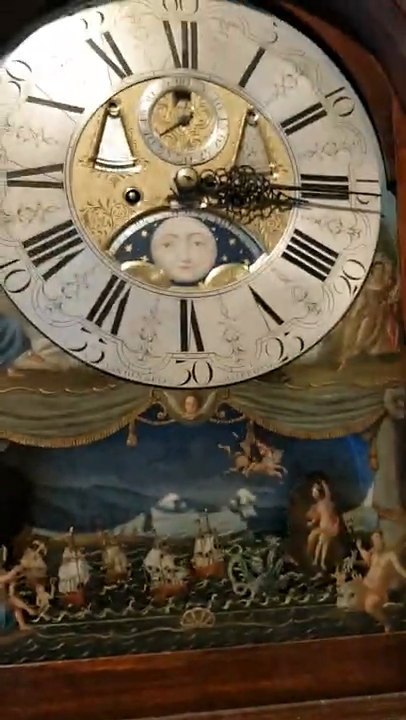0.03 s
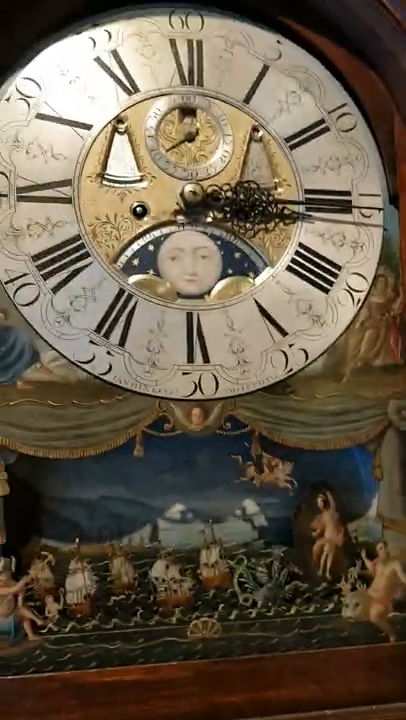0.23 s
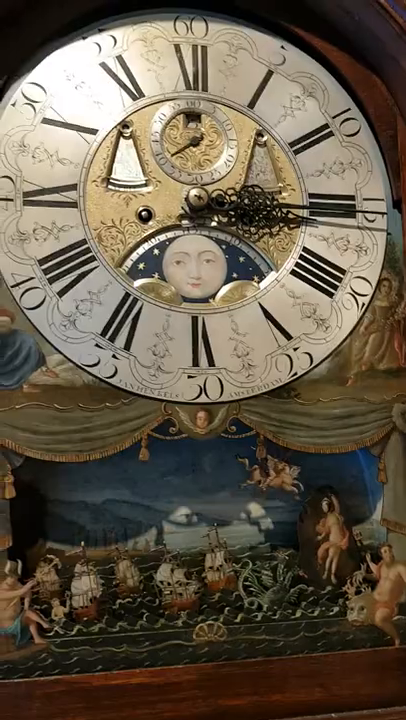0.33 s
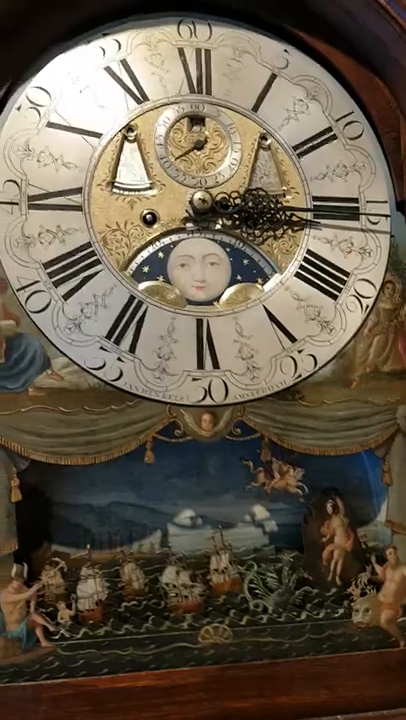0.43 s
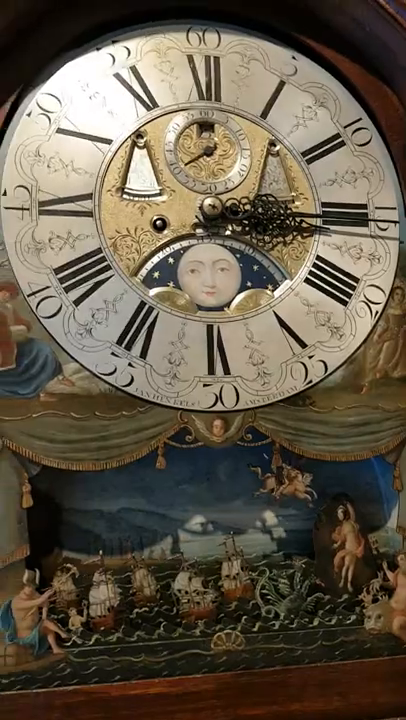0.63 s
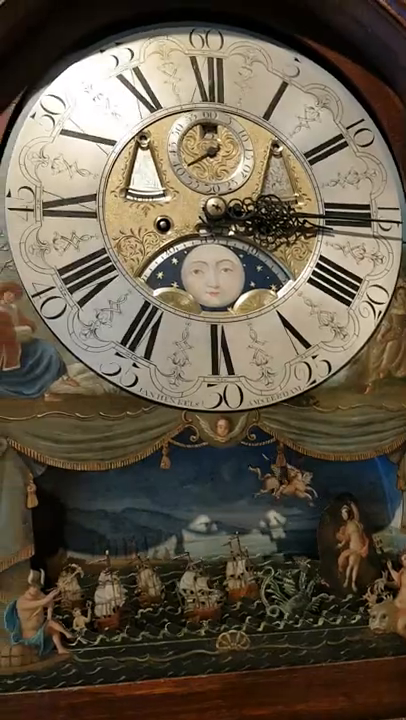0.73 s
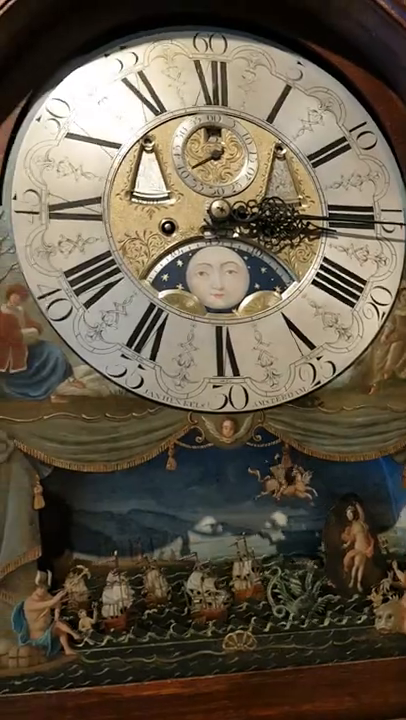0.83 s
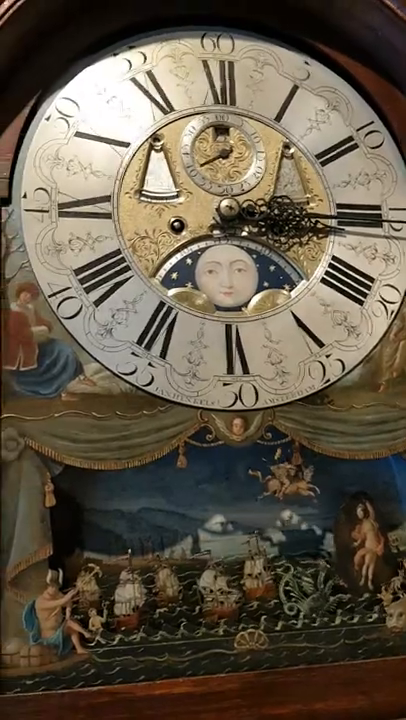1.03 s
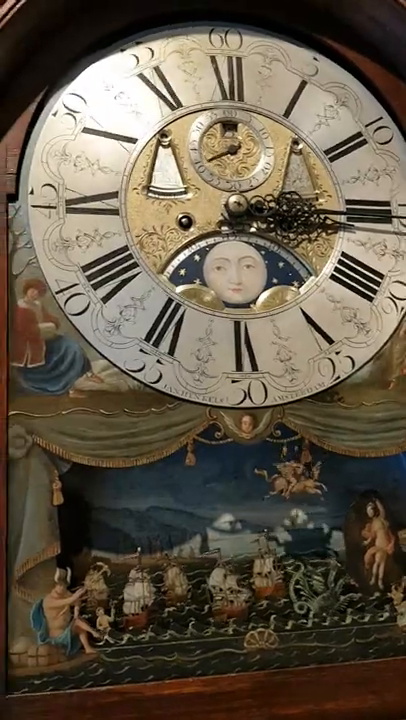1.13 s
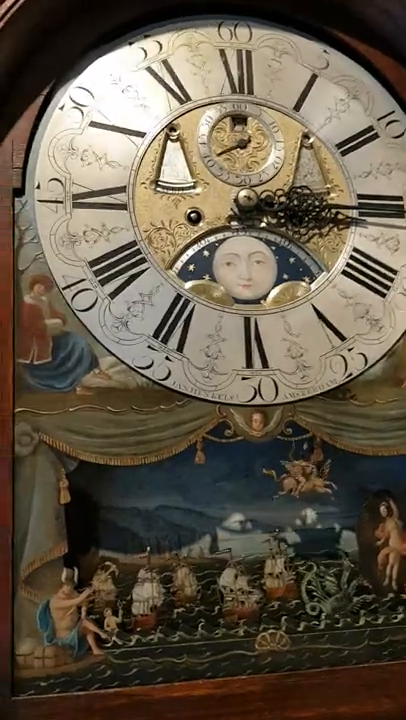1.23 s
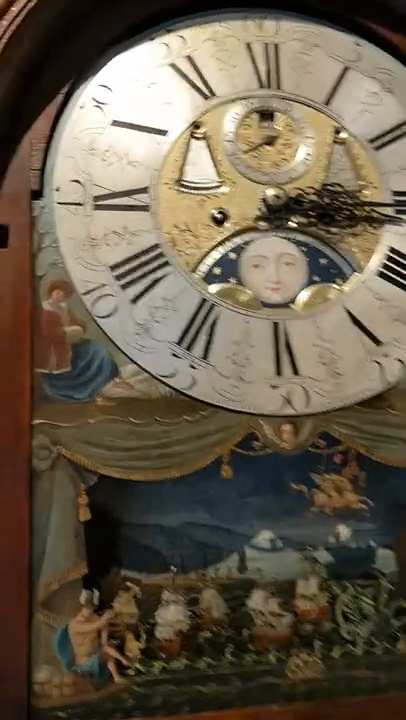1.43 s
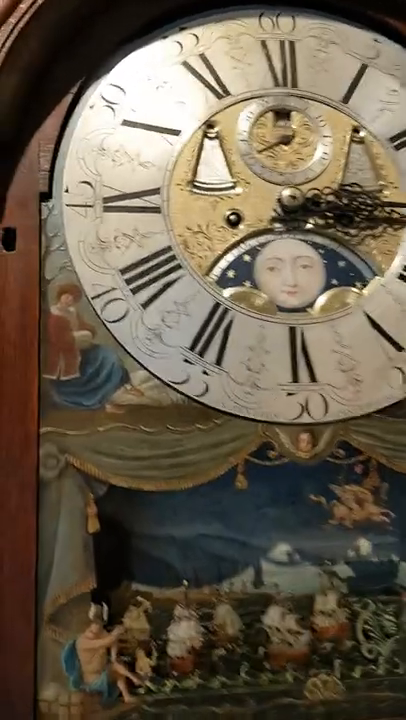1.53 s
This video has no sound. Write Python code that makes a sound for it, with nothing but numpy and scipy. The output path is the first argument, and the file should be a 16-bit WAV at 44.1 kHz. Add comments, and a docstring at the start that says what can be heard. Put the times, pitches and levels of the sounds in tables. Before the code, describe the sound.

A single clock bell stroke, close in a quiet room. Faint hiss until about 0.22 seconds, when the hammer trips with a click and hits at 0.23: a hard, brilliant clang. Piercing overtones fade first, leaving a wavering, beating ring to the end at about 1.5. Small clicks follow at 0.35 and 0.63, soft whirring beneath, then very faint rattles and a dull wooden double knock near 1.15.

```python
"""One bright bell stroke rings out, its split partials beating as they fade, most of the high ones first.
Place: a quiet room, a longcase clock close by, heard through a stereo pair of microphones.
The bell is a sum of decaying sinusoids; the hammer trips with a click and lands as a burst of coloured noise.
Enveloped noise also makes the lever clicks, thin rattles and dull knocks of the wooden case.
Behind them steady coloured noises make the soft whirr of the works, a hiss and a low hum."""
import sys
import numpy as np
from scipy import signal
from scipy.fft import rfft, irfft
from scipy.io import wavfile

SR = 44100
rng = np.random.default_rng(int(sys.argv[2]) if len(sys.argv) > 2 else 0)


def digitize_waveform(pressure):
    """Quantize a signal to 16-bit integers and store it at the path in sys.argv[1].

    Rows of a 2-D input are taken as channels; values are limited to [-1, 1].
    """
    field = np.atleast_2d(pressure).T
    bounded = np.clip(field, -1, 1)
    quanta = np.round(bounded * 32767).astype(np.int16)
    wavfile.write(sys.argv[1], SR, quanta)


N = 70560
TIME = np.arange(N) / SR  # s

# Colours list [f/Hz, relative density/dB per Hz]: noise() sets the rms to 1, the level comes after.
# Time constants of a rise are called rise or swell; t60 is the time to fall by 60 dB.

# Long partials of the bell, before sway and twin: [f/Hz, level/dB, left minus right/dB, width/half cycles
# between channels, t60/s, swell/s, beat/Hz (negative: twin below), twin level/dB, time of a dip/s,
# beat lag between channels/cycles]
LONG_PARTIALS = [ (593.3, -41, -1.8, .2, 40, .003, 2.6, -5.5, .41, 0),
                 (1608.4, -36, 3, .44, 60, .003, 3.82, -6.5, .405, .06),
                 (2964.0, -29, 6.5, .4, 7.5, .003, 22.7, -27, .29, .2),
                 (4623.2, -29.5, -1, .72, 2.8, .012, 36, -22, .25, .3),
                 (6508.5, -19.5, 1, .36, .85, .01, 26.5, -8, .246, .4),
                 (11150.5, -25, 7, .35, .52, .006, -19.5, -7, .279, .05)]
# Slow sway of three long partials, keyed by f/Hz: [t/s, level/dB]
SWAY = {1608.4: [(.23, -2), (.35, -2), (.5, 0), (.95, -1), (1.08, -1.5), (1.19, 5), (1.33, 1.5), (1.5, 3),
        (1.6, 2)], 2964.0: [(.23, 0), (.4, 1), (.7, 1), (.89, -3), (.95, 0), (1.07, -8), (1.17, 1),
        (1.28, 2), (1.45, 0), (1.55, 2)], 4623.2: [(.23, 0), (.32, 3), (.5, 2), (.6, -3), (.7, 1), (.8, 0),
        (.98, 3), (1.15, 0), (1.35, 5), (1.46, 0), (1.6, 7)]}
# Short partials of the bell, before CLANG_DB: [f/Hz, level/dB, left minus right/dB,
# width/half cycles between channels, t60/s]
SHORT_PARTIALS = [ (5437, -42, 0, .4, .17), (8365, -34, 0, .4, .44), (8679, -36, 2, .5, .38),
                  (8720.3, -19, 4, .25, .3), (9382.7, -32, -5, .4, .48), (10280.3, -35, -1, .3, .38),
                  (10351, -39, 0, .4, .4), (10830, -43, 2, .4, .4), (11131, -40, 1, .25, 1.3),
                  (11500, -42, 2, .4, .55), (12658, -34, 7, .4, .3), (13113.7, -34, 4, .4, .38),
                  (13817, -36, 3, .55, .48), (13849.3, -19.5, 6, .7, .36), (14744.8, -27, 5, .4, .32),
                  (14840, -36, 2, .4, .3), (15082.4, -27, -1, .4, .35), (15178, -44, 2, .25, 1.4),
                  (15240, -48, 2, .3, 1.0)]
# Colour of the hammer's crash on bell and frame: [f/Hz, density/dB per Hz]
CRASH_COLOUR = [(60, -29), (250, -10), (900, -15.5), (2400, 0.5), (3500, -10), (5800, -8), (8700, 6),
                (10000, 2.5), (11300, 1), (12100, 7.5), (13300, -5), (15500, -4)]
# Lever clicks: [t/s, level/dB, t60/s, room tail relative to the click/dB]
CLICKS = [(0.2188, -16.5, 0.012, -20), (0.352, -27, 0.024, -13), (0.6271, -30, 0.063, -11.5),
          (0.97, -54.5, 0.024, -11), (1.065, -59, 0.055, -1), (1.085, -57, .06, -12), (1.16, -62, 0.18, 2),
          (1.473, -55.5, 0.045, -4.5), (1.49, -65, 0.032, -11)]
# Colour of a click's crack: [f/Hz, density/dB per Hz]
CLICK_COLOUR = [(100, -11), (500, -10), (2300, -25), (4000, -5), (6000, -7), (8000, 2.5), (13000, -8),
                (16000, 4)]
# Colour of a click's room tail: [f/Hz, density/dB per Hz]
CLICK_TAIL_COLOUR = [(80, -34), (340, 7.5), (900, 3.5), (2100, 8.5), (3600, -6), (6000, 0), (8000, -1.5),
                     (13000, 1), (16000, -9.5)]
# Faint rattles of the works: [t/s, level/dB, t60/s]
RATTLES = [(.972, -50.5, 0.13), (1.065, -51, 0.25), (1.095, -66, 0.06), (1.325, -68.5, .08),
           (1.489, -48.5, 0.089)]
# Colour of the rattles: [f/Hz, density/dB per Hz]
RATTLE_COLOUR = [(600, -22.5), (1700, -4), (2050, -2), (2500, -0.5), (3500, -7.5), (11200, -33),
                 (11900, -0.5), (12800, -22), (16000, -34)]
# Dull knocks in the wooden case: [t/s, level/dB]
KNOCKS = [(.355, -53.5), (.63, -51), (1.136, -39.5), (1.16, -41)]
# Colour of the knocks: [f/Hz, density/dB per Hz]
KNOCK_COLOUR = [(40, -27), (130, -10.5), (330, -0.5), (560, -2.5), (800, -13), (1500, -19.5), (4000, -21.5),
                (12000, -44)]
# Level of the whirr of the works: [t/s, rms level/dB]
WHIRR_LEVEL = [(0, -82), (.2, -59), (.25, -51.5), (.42, -53.5), (.6, -54), (.85, -57.5), (1.08, -61.5),
               (1.3, -61.5), (1.6, -58.5)]
# Colour of the whirr: [f/Hz, density/dB per Hz]
WHIRR_COLOUR = [(60, -13), (150, -19), (195, 2), (260, -12.5), (360, -3.5), (750, -7.5), (1300, -9.5),
                (2400, -13.5), (3600, -24), (8000, -41), (16000, -53)]
# Level of the background hiss: [t/s, rms level/dB]
HISS_LEVEL = [(0, -54), (.2, -54.5), (.4, -57), (.9, -62.5), (1.03, -62), (1.2, -53), (1.4, -58),
              (1.6, -56.5)]
# Colour of the hiss: [f/Hz, density/dB per Hz]
HISS_COLOUR = [(25, -1), (50, 2), (200, 12), (600, 8.5), (1100, 12), (2000, 6.5), (3500, 3), (6000, -1),
               (12000, -2), (16000, 6.5)]
# Level of the low hum of the room: [t/s, rms level/dB]
ROOM_HUM_LEVEL = [(0, -80), (.4, -68), (1.05, -65), (1.4, -68.5), (1.55, -55), (1.6, -55)]
# Colour of the low hum: [f/Hz, density/dB per Hz]
ROOM_HUM_COLOUR = [(20, -29), (50, -10), (76, -22), (96, 5.5), (118, -20), (200, -26), (400, -44)]
# Noise at the two microphones: [f/Hz, likeness from -1 to 1, left minus right/dB]
STEREO = [(60, 1, -0.5), (303, 0.77, -1), (1000, 0.12, 0), (2505, 0.09, 0.5), (5600, 0.033, 0),
          (7500, 0.1, 3.5), (13000, 0.041, 1.5)]

STRIKE_S = .232
CLANG_DB, CLANG_SWELL_S = 1, .0031
WAVER_DB, WANDER_RAD, WAVER_PER_S = .8, .12, 4  # spreads and speed of each partial's slow drifts
FLUTTER, FLUTTER_PER_S, FLUTTER_T60_S = .24, 37, 1.6  # reflections from case and room
CRASH_DB, CRASH_T60_S = -28.5, .065
CRASH_TAIL_DB, CRASH_TAIL_T60_S = -30.5, .6
CRACK_RISE_S, BLOW_RISE_S, RATTLE_RISE_S = .0003, .0008, .0027
ROOM_T60_S = .41
KNOCK_T60_S, KNOCK_TAIL_DB, KNOCK_TAIL_T60_S = .07, -6, .67  # tail level relative to the knock
CUTOFF_HZ = 15700
HALVES = np.array([[.5], [-.5]])  # shares a left-right difference between the channels


def bell():
    """Long modes beat against weaker twins and some sway; short modes make the bright clang."""
    clang = sum(partial(*row, CLANG_SWELL_S) for row in SHORT_PARTIALS)
    out = from_db(CLANG_DB) * clang
    for hz, *mode, beat, twin_db, dip, lag in LONG_PARTIALS:
        twin_cycles = beat * (TIME - dip) - lag * HALVES
        beating = 1 - from_db(twin_db) * np.exp(2j * np.pi * twin_cycles)
        sway = level(SWAY[hz]) if hz in SWAY else 1
        out = out + partial(hz, *mode) * beating * sway
    return out.real


def partial(hz, db, pan_db, width, t60, swell):
    """One bell mode: a decaying complex sinusoid, drifting in level and phase in each channel."""
    cycles = hz * (TIME - STRIKE_S) + rng.random()
    phase = 2 * np.pi * cycles + np.pi * width * HALVES
    phase = phase + WANDER_RAD * drift(WAVER_PER_S)
    # reflections ruffle the young mode in level and phase
    reflections = drift(FLUTTER_PER_S) + 1j * drift(FLUTTER_PER_S)
    ruffle = 1 + FLUTTER * blow(STRIKE_S, swell, FLUTTER_T60_S) * reflections
    gain = from_db(db + WAVER_DB * drift(WAVER_PER_S)) * pan(pan_db)
    return gain * blow(STRIKE_S, swell, t60) * ruffle * np.exp(1j * phase)


def hammer():
    """The blow excites a short broadband crash with a longer tail in case and room."""
    crash = from_db(CRASH_DB) * blow(STRIKE_S, BLOW_RISE_S, CRASH_T60_S)
    tail = from_db(CRASH_TAIL_DB) * blow(STRIKE_S, BLOW_RISE_S, CRASH_TAIL_T60_S)
    return noise(CRASH_COLOUR) * (crash + tail)


def levers():
    """Levers of the strike train, first the hammer's trip: bright cracks with duller room tails."""
    crack_power = tail_power = 0
    for start, db, t60, tail_db in CLICKS:
        crack = from_db(db) * blow(start, CRACK_RISE_S, t60)
        tail = from_db(db + tail_db) * blow(start, BLOW_RISE_S, ROOM_T60_S)
        crack_power = crack_power + crack ** 2
        tail_power = tail_power + tail ** 2
    return noise(CLICK_COLOUR) * np.sqrt(crack_power) + noise(CLICK_TAIL_COLOUR) * np.sqrt(tail_power)


def rattles():
    """Small parts of the works stir: short noise bursts with a thin metallic colour."""
    envelope = sum(from_db(db) * blow(start, RATTLE_RISE_S, t60) for start, db, t60 in RATTLES)
    return noise(RATTLE_COLOUR) * envelope


def case():
    """The wood booms faintly under the falling levers, then gives a louder double knock."""
    power = 0
    for start, db in KNOCKS:
        knock = blow(start, BLOW_RISE_S, KNOCK_T60_S)
        tail = from_db(KNOCK_TAIL_DB) * blow(start, BLOW_RISE_S, KNOCK_TAIL_T60_S)
        power = power + from_db(db) ** 2 * (knock ** 2 + tail ** 2)
    return noise(KNOCK_COLOUR) * np.sqrt(power)


def whirr():
    """The works whirr: coloured noise that swells at the strike and then sinks."""
    return level(WHIRR_LEVEL) * noise(WHIRR_COLOUR)


def hiss():
    """Broad background noise of slowly changing level."""
    return level(HISS_LEVEL) * noise(HISS_COLOUR)


def room_hum():
    """Low hum: noise peaking near 96 Hz, strongest at the end."""
    return level(ROOM_HUM_LEVEL) * noise(ROOM_HUM_COLOUR)


def noise(colour):
    """Stereo noise of rms 1, alike in the bass and nearly unrelated in the treble."""
    log_hz = np.log(np.maximum(np.arange(N // 2 + 1) * SR / N, 1))

    def column(rows, axis):
        """Table column interpolated over log frequency."""
        rows = np.array(rows)
        return np.interp(log_hz, np.log(rows[:, 0]), rows[:, axis])

    alike = column(STEREO, axis=1)
    mid, side = rfft(rng.standard_normal((2, N)))
    both = np.sqrt(1 + alike) * mid + np.sqrt(1 - alike) * side * [[1], [-1]]
    out = irfft(both * pan(column(STEREO, axis=2)) * from_db(column(colour, axis=1)), N)
    return out / out.std()


def blow(start, rise, t60):
    """Envelope that rises quickly and dies away exponentially."""
    age = np.maximum(TIME - start, 0)
    return (1 - np.exp(-age / rise)) * np.exp(-np.log(1000) * age / t60)


def drift(rate):
    """Separate smooth random motion for each channel, spread 1: white noise through two low-pass poles."""
    knots = np.arange(int(TIME[-1] * 200) + 400) / 200  # 200 knots per second
    pole = np.exp(-2 * np.pi * rate / 200)
    slow = signal.lfilter([1], [1, -2 * pole, pole * pole], rng.standard_normal((2, len(knots))))
    # start 1 s in, once the filter has settled
    return np.array([np.interp(TIME + 1, knots, s / s.std()) for s in slow])


def level(curve):
    """Gain over time from (t/s, level/dB) points."""
    return from_db(np.interp(TIME, *np.transpose(curve)))


def pan(db):
    """Left and right gains for a level difference in dB."""
    return from_db(HALVES * db)


def from_db(db):
    """Decibels to amplitude gain."""
    return 10 ** (np.asarray(db) / 20)


def scene():
    """Bell and mechanism close by, over the quiet room."""
    strike = bell() + hammer()
    mechanism = levers() + rattles() + case()
    return strike + mechanism + whirr() + hiss() + room_hum()


def record(dry):
    """A steep elliptic low-pass cuts the top of the stereo sound."""
    low_pass = signal.ellip(12, .1, 80, CUTOFF_HZ, fs=SR, output="sos")  # .1 dB ripple, 80 dB stop
    return signal.sosfilt(low_pass, dry)


dry = scene()
out = record(dry)
digitize_waveform(out)
```